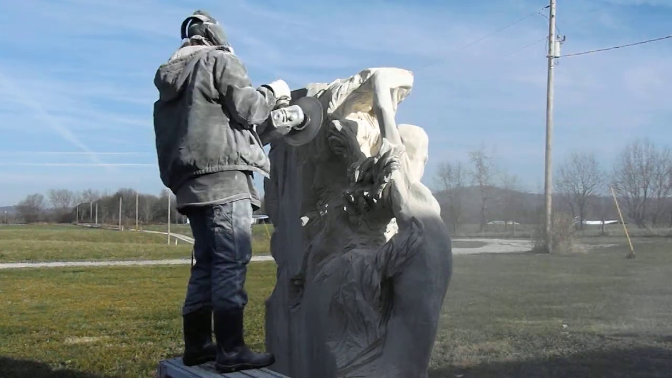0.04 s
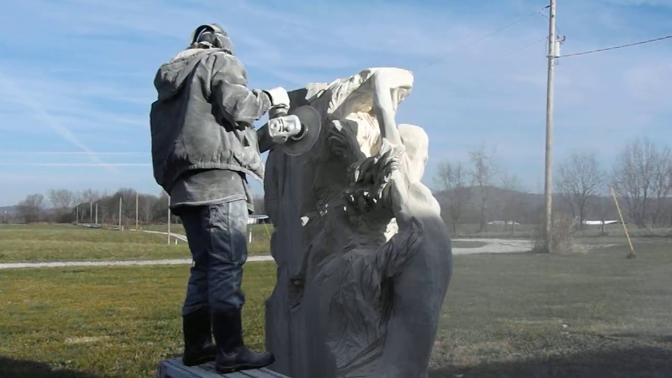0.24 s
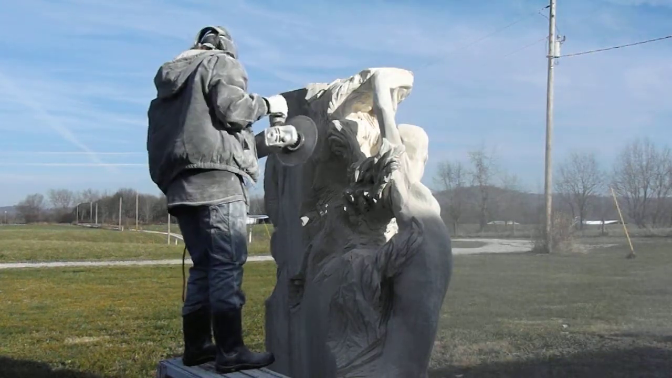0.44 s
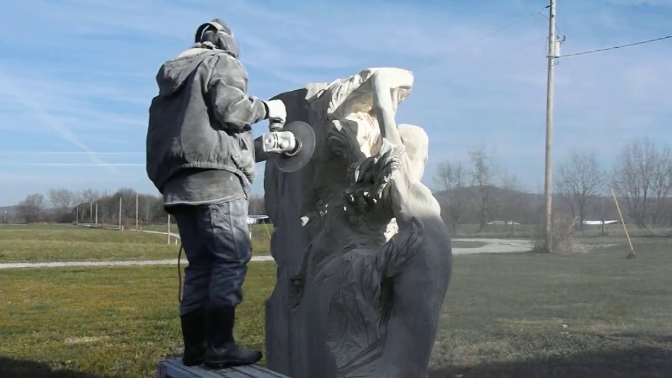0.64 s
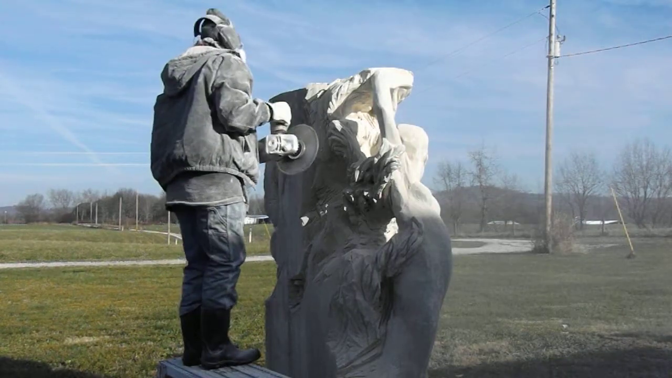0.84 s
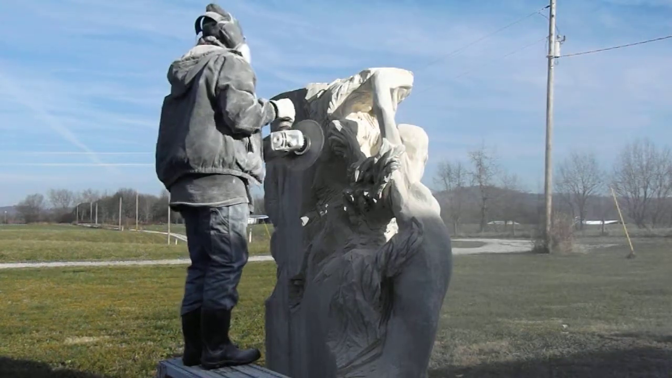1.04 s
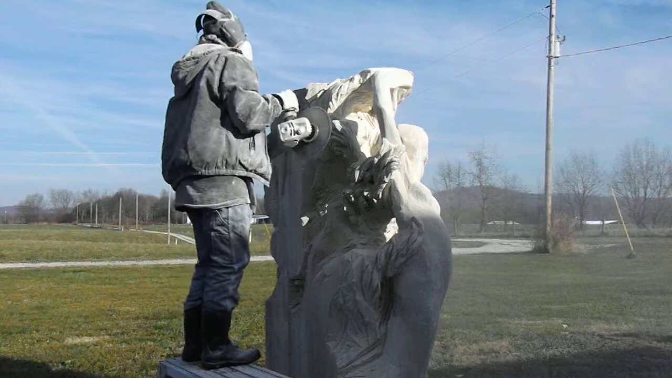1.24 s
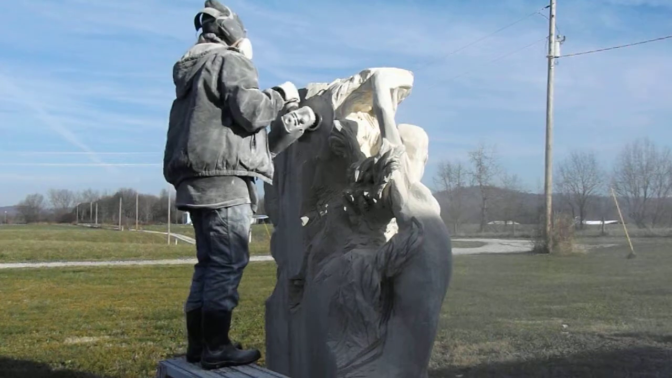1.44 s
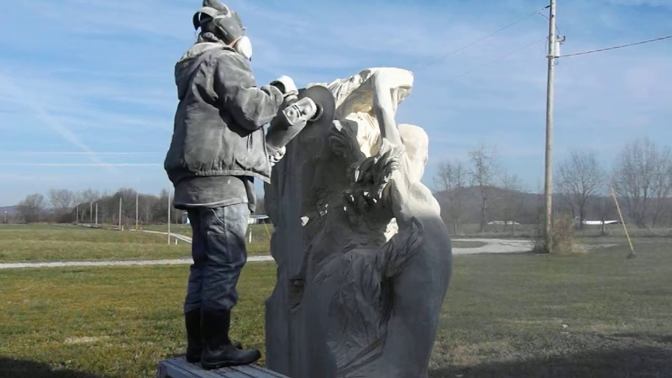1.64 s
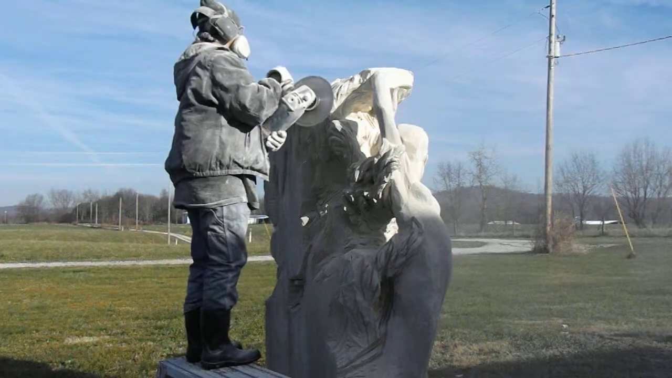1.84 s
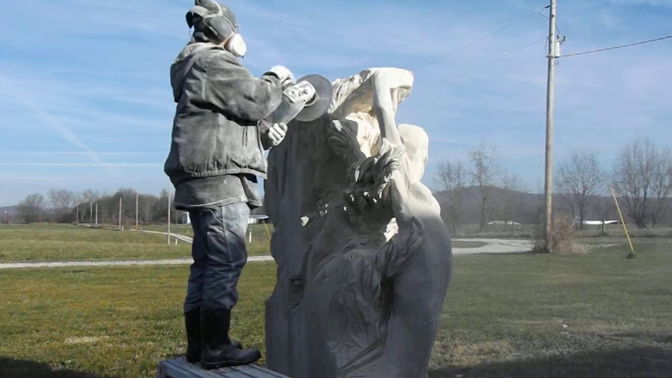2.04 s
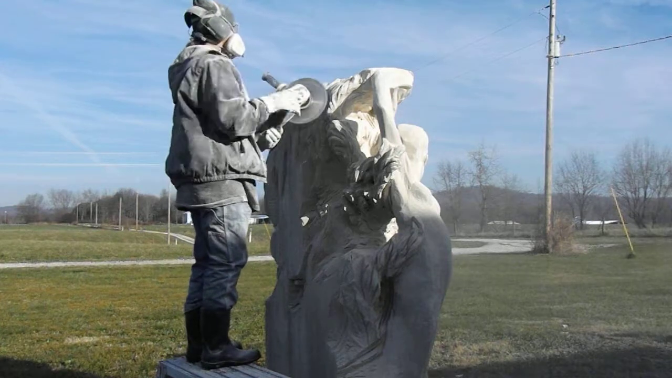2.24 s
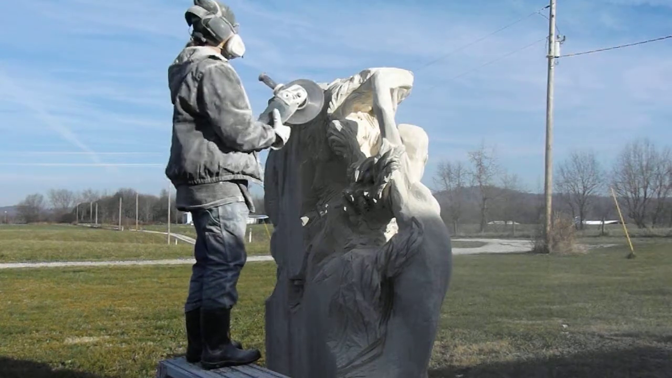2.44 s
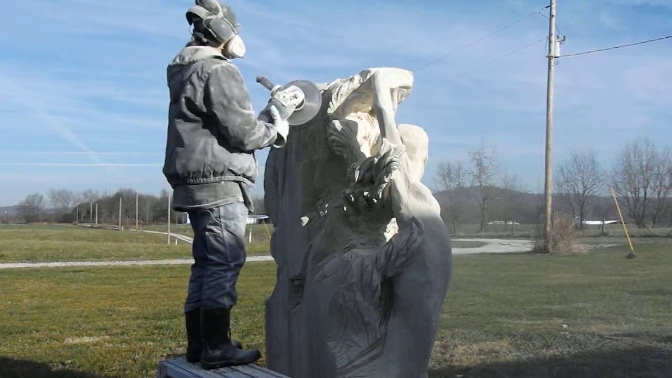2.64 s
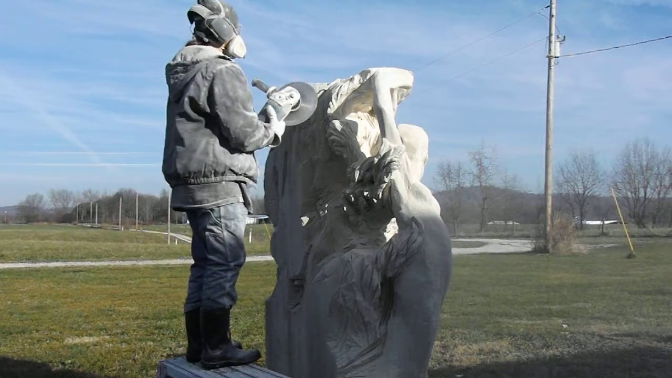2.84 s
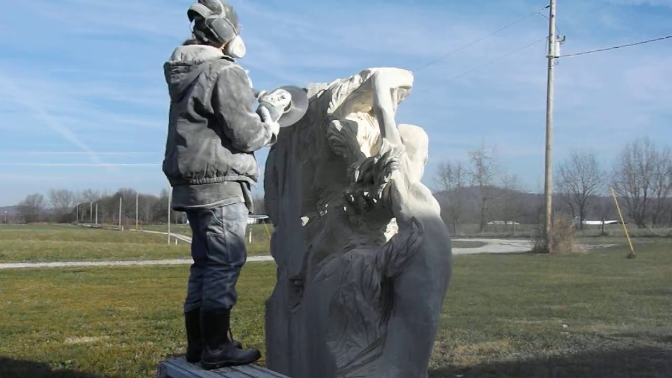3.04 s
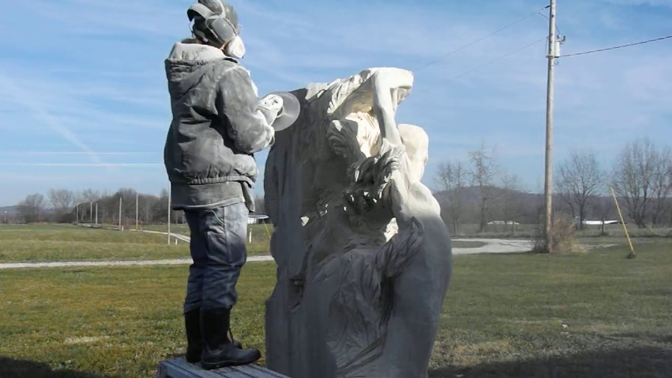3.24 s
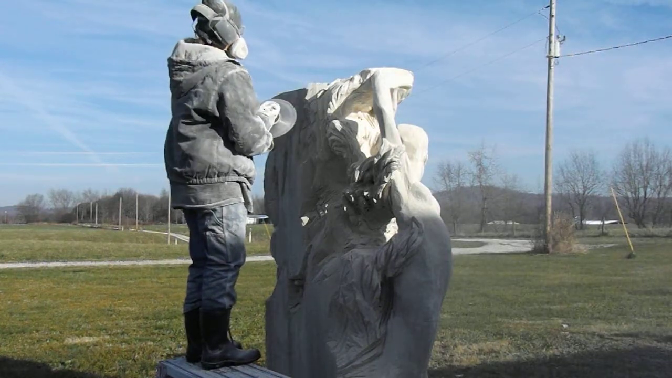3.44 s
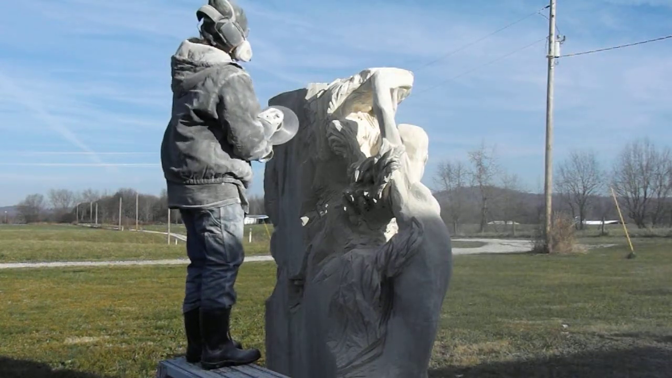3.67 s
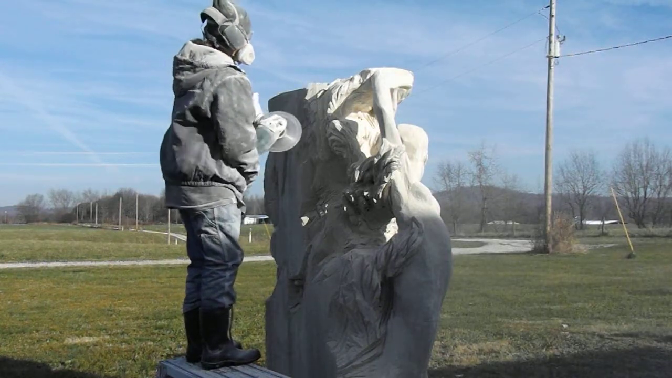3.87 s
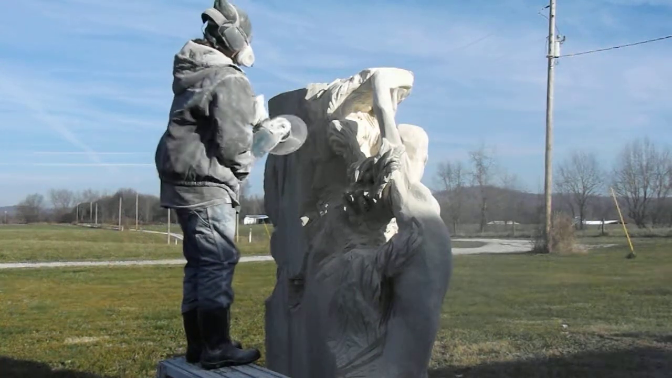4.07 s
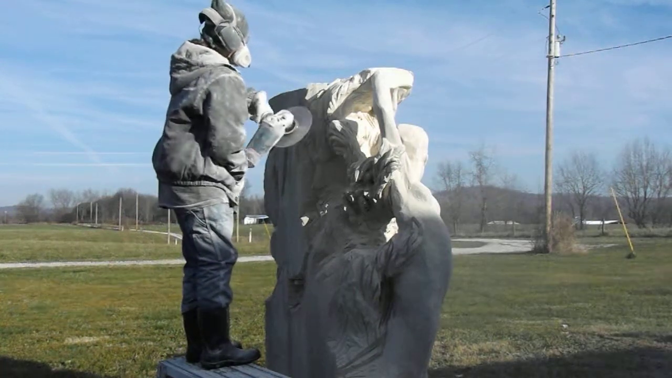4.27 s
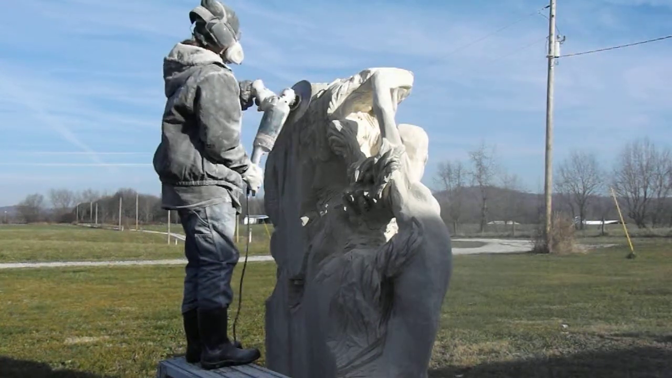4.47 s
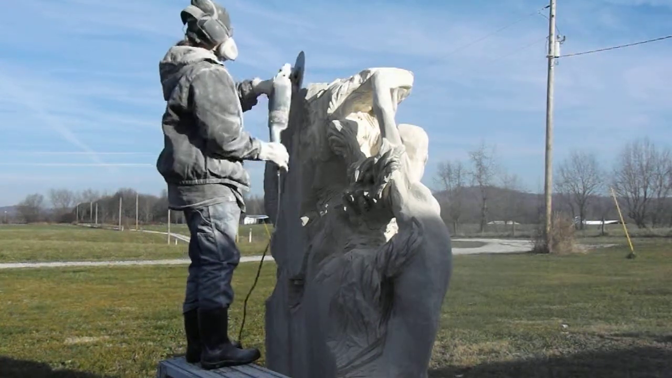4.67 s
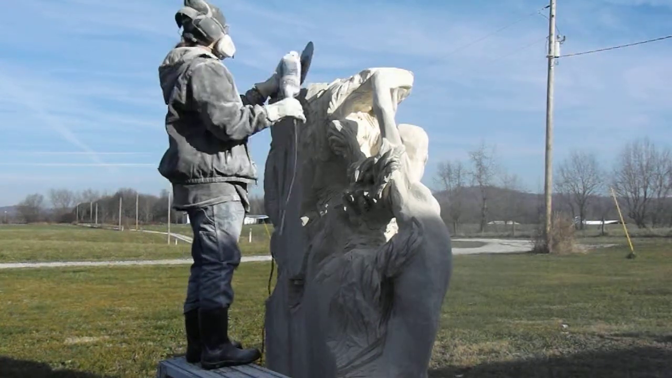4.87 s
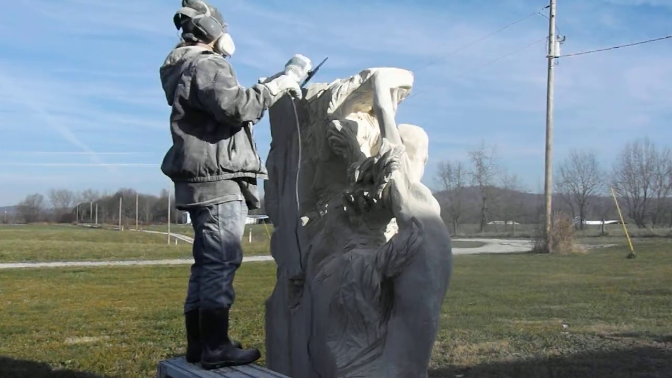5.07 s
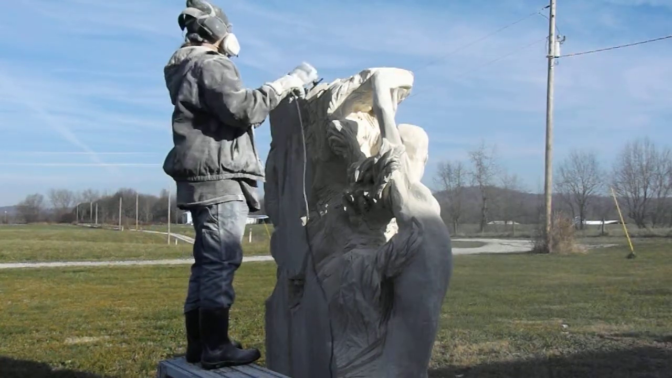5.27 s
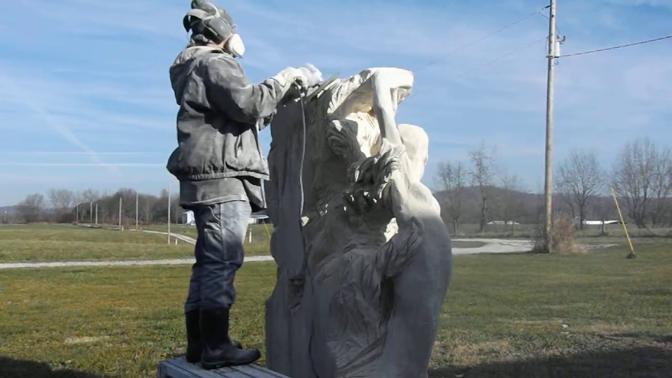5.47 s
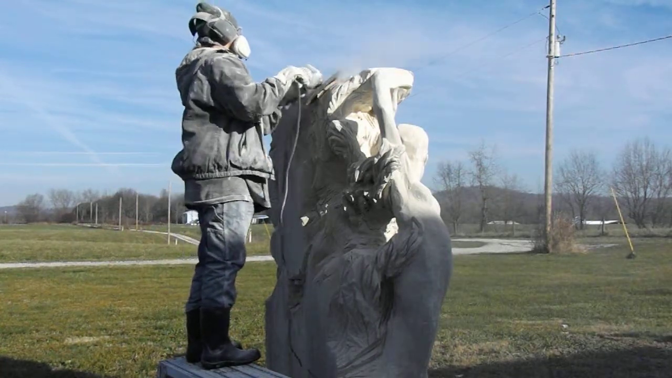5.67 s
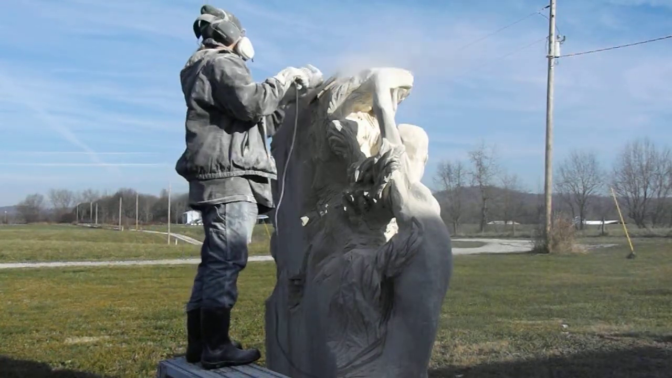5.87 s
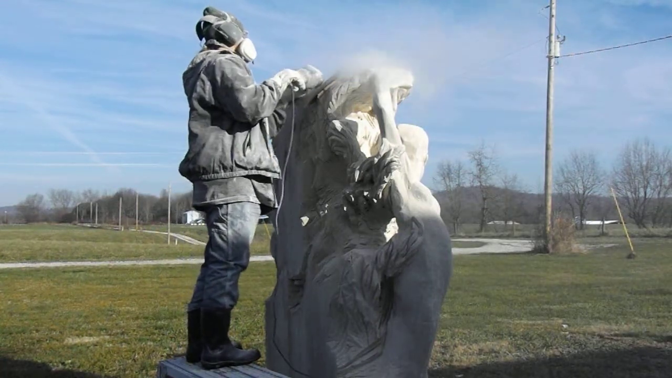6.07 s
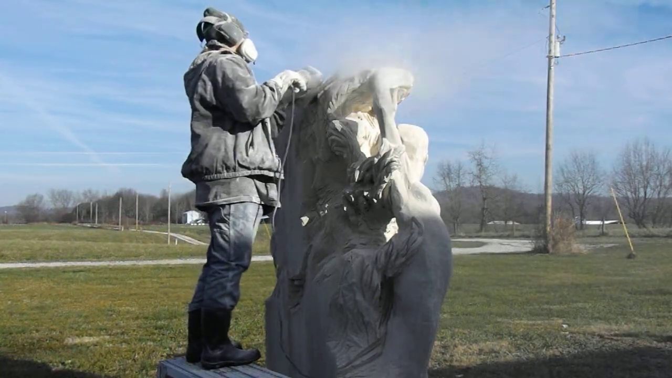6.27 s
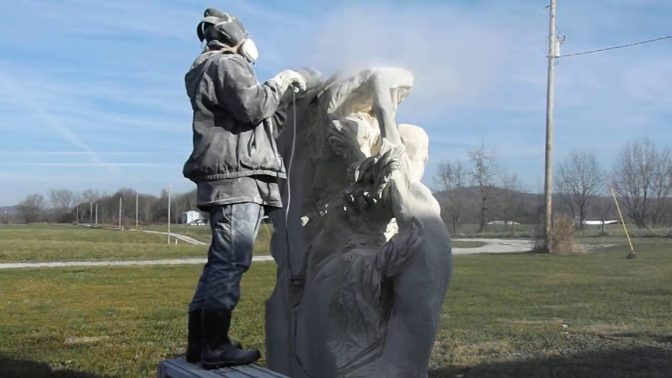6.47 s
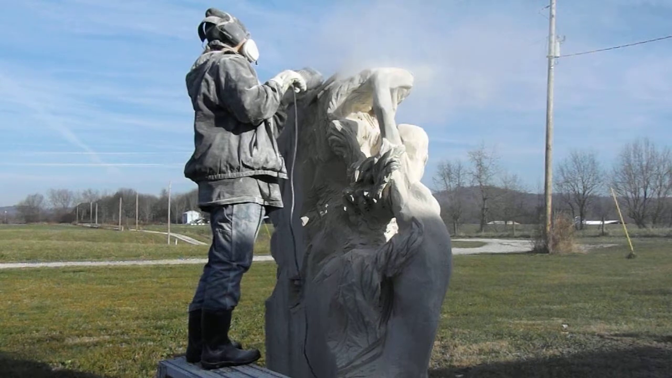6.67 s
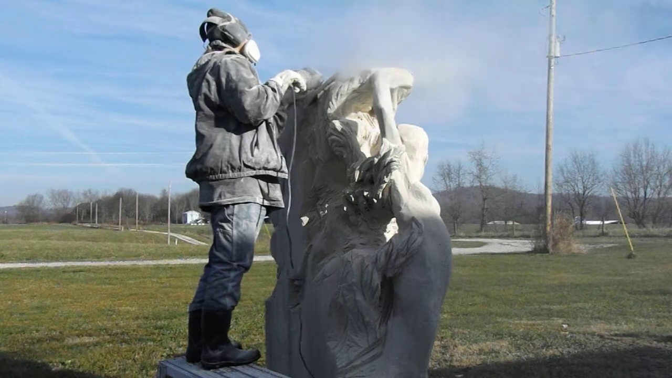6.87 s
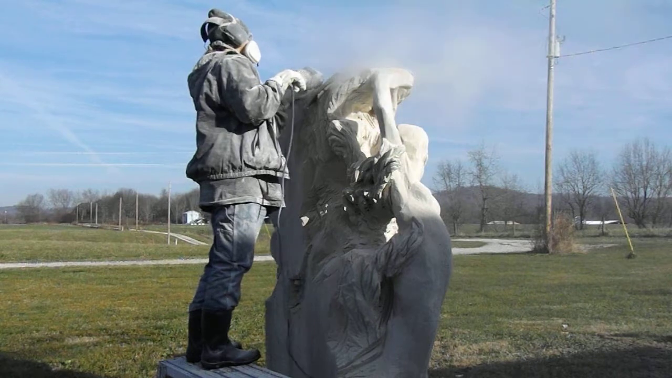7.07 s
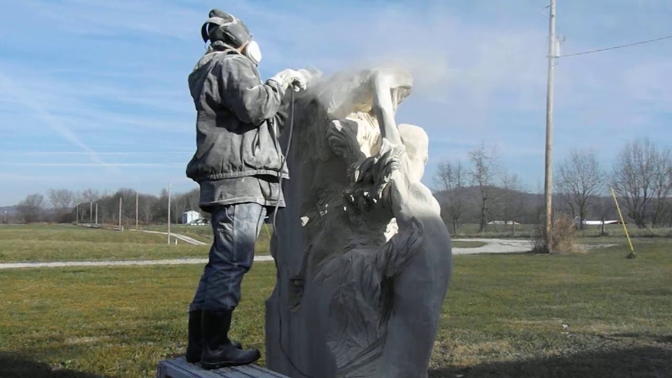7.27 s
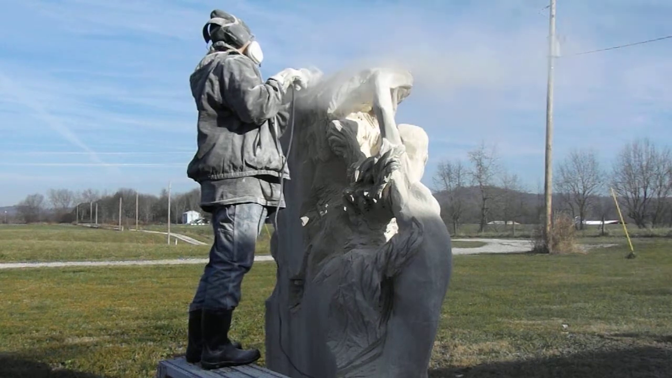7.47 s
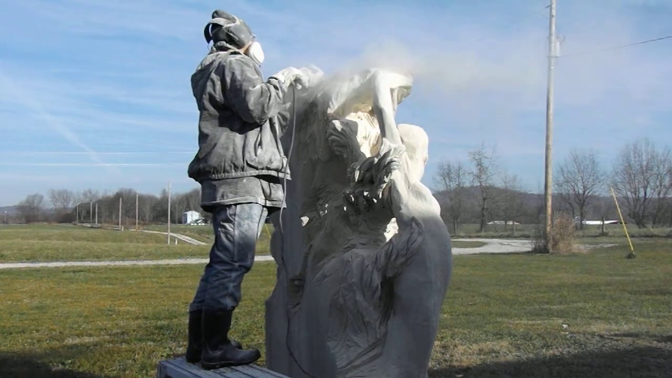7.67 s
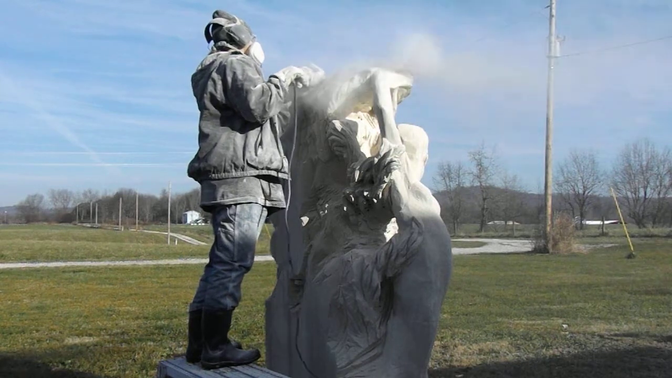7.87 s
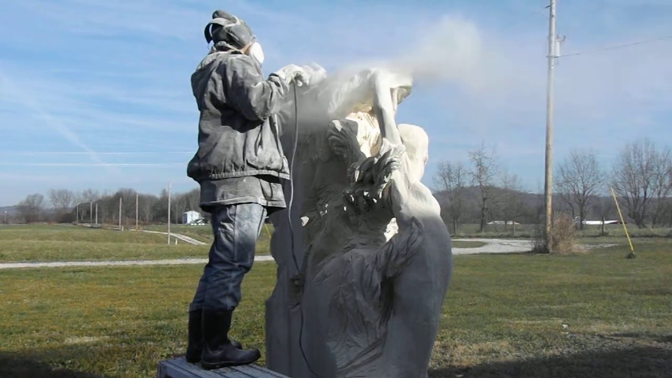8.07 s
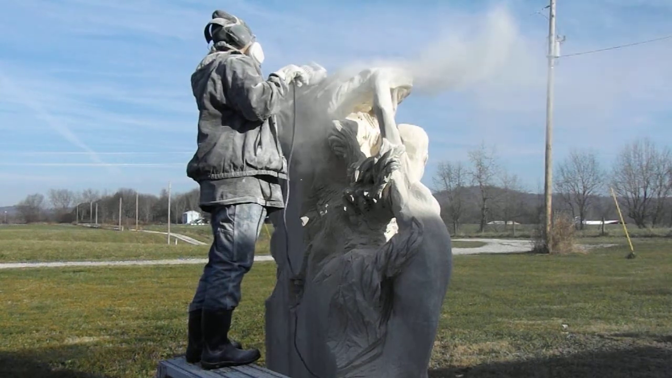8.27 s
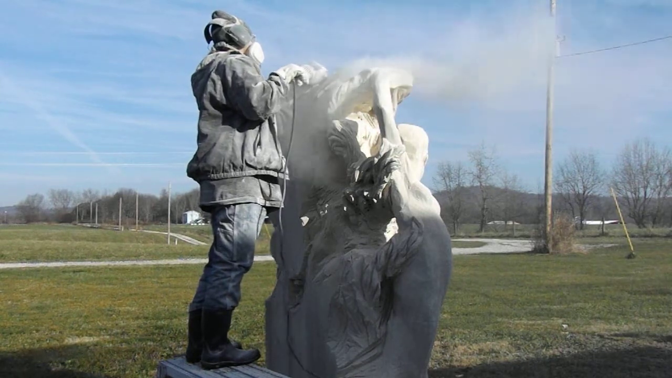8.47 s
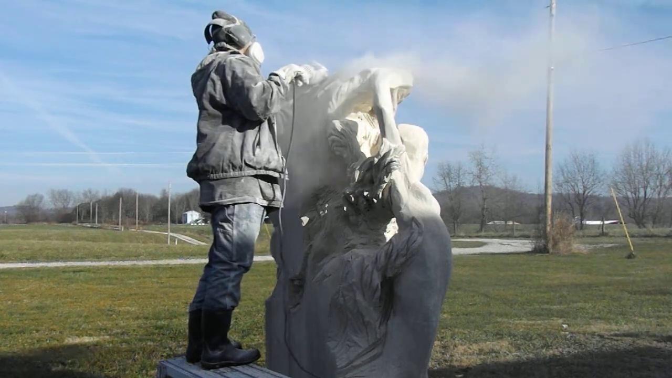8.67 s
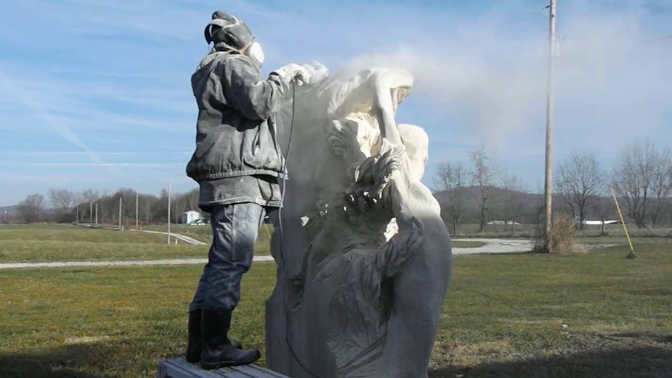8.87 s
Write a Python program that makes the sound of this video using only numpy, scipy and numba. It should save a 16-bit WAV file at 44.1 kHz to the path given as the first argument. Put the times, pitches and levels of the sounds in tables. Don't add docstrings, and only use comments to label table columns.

```python
import sys
import numpy as np
from scipy import signal
from scipy.fft import rfft, irfft
from scipy.io import wavfile
from scipy.ndimage import uniform_filter1d
from numba import njit

SR = 44100
rng = np.random.default_rng(int(sys.argv[2]) if len(sys.argv) > 2 else 0)


def pcm_store(signal):
    levels = np.round(np.clip(np.atleast_2d(signal), -1, 1) * 32767)
    wavfile.write(sys.argv[1], SR, levels.astype(np.int16).T)


def linear_from_db(decibels):
    return 10 ** (np.asarray(decibels, float) / 20)


N = 393372
t = np.arange(N) / SR
TOUCH_S = 5.453
DROWNED_S = TOUCH_S + 0.14


def curves(table):
    s, *columns = np.transpose(table)
    return [np.interp(t, s, c) for c in columns]


def unit(x):
    return x / np.sqrt(np.mean(x ** 2))


def walk(rate):
    k = int(SR / rate)
    steps = np.repeat(rng.standard_normal(N // k + 1), k)
    return 1.04 * uniform_filter1d(uniform_filter1d(steps, k), k)[:N]


def colour(x, table):
    hz, db = np.transpose(table)
    f = np.fft.rfftfreq(N, 1 / SR) + 1
    return irfft(rfft(x) * linear_from_db(np.interp(np.log(f), np.log(hz), db)), N)


BAND_EDGES_HZ = [1400, 4400, 7000]


def bands(x, main_db, low_db, body_db, top_db):
    f, spectrum = np.fft.rfftfreq(N, 1 / SR) + 1, rfft(x)
    below = [0 * f] + [1 / (1 + (f / edge) ** 8) for edge in BAND_EDGES_HZ] + [1 + 0 * f]
    parts = [unit(irfft(spectrum * (b - a), N)) for a, b in zip(below, below[1:])]
    return linear_from_db(main_db) * sum(linear_from_db(db) * p for db, p in zip([low_db, body_db, 0, top_db], parts))


@njit
def ring(x, hz, width):
    y, band, low = np.empty(len(x)), 0., 0.
    for i in range(len(x)):
        g, k = np.tan(np.pi * hz[i] / SR), width / hz[i]
        v = (band + g * (x[i] - low)) / (1 + g * (g + k))
        band, low, y[i] = 2 * v - band, low + 2 * g * v, k * v
    return y


def ring_twice(x, hz, width):
    return ring(ring(x, hz, width), hz, width)


@njit
def gain_control(x, top, attack, release):
    y, e = np.empty(len(x)), top
    for i in range(len(x)):
        y[i] = x[i] * top / e
        want = max(abs(x[i]), top)
        e += (want - e) * (attack if want > e else release)
    return y


# time in seconds, speed in turns a second.
DISC_SPEED = [
    (5.5, 96.4),
    (5.8, 90.4),
    (6.0, 86.0),
    (6.17, 80.2),
    (6.5, 75.2),
    (7.0, 69.9),
    (7.6, 65.3),
    (7.9, 62.5),
]


def disc_spin():
    return curves(DISC_SPEED)[0]


# time in seconds, hiss in dB as the fan faces us, whine in dB,
# vent resonance in Hz as it tilts, brush window open 0-1.
HOLD_PATH = [(0.0, -20, -38, 1110, .7), (0.25, -19.5, -35, 1070, .95), (1.05, -19, -34.5, 1060, .95),
             (1.3, -19, -36, 990, .75), (1.8, -20, -37.5, 970, .85), (2.2, -21.5, -45, 1020, .55),
             (2.5, -20.5, -42.5, 1030, .6), (3.0, -22, -39.5, 1060, .65), (3.5, -25.5, -39, 1040, .15),
             (4.1, -21.5, -35.5, 1070, .6), (4.5, -22.5, -41, 875, .85), (4.7, -23.5, -44, 825, .3),
             (5.15, -27, -43.5, 875, .1), (5.42, -26, -43.5, 1170, .1), (5.62, -32, -55.5, 1220, .1),
             (6.8, -24, -72.5, 1220, .1), (7.4, -23, -58, 1220, .1), (7.75, -28, -70, 1220, .1)]


def hold():
    hiss_db, whine_db, vent_hz, window = curves(HOLD_PATH)
    upright_hz, tilted_hz = 1000, 850
    tilt = np.clip((upright_hz - vent_hz) / (upright_hz - tilted_hz), 0, 1)
    return hiss_db, whine_db, vent_hz, window, tilt


def held_db(db, per_db_away, tilted_db):
    hiss_db, _, _, _, tilt = hold()
    facing_db = -19.5
    return db + per_db_away * (facing_db - hiss_db) + tilted_db * tilt


# multiple of motor speed, level in dB against the whine.
MOTOR_ORDERS = [(.5, -32), (4, -18)]


def motor(spin):
    gear, bars = 4.408, 30
    _, whine_db, _, window, _ = hold()
    drown_db = np.interp(t, [TOUCH_S, DROWNED_S], [0, -45])
    bars_db = -45.5 - 22 * (1 - window) + drown_db
    third_db = held_db(-30, 0.1, tilted_db=-4.5) + drown_db
    eighth_db = whine_db + 6 + held_db(0.3, 0.96, tilted_db=-3) + drown_db
    whine_db = whine_db + 3.0 * walk(8) * (t > DROWNED_S)
    turn = 2 * np.pi * np.cumsum(gear * spin * (1 + 0.0006 * walk(6))) / SR
    whine = np.sin(turn)
    for k, db in MOTOR_ORDERS:
        whine += linear_from_db(db + 11.0 * walk(4.7)) * np.sin(k * turn)
    out = linear_from_db(whine_db + 1.0 * walk(30)) * whine
    out += linear_from_db(bars_db) * np.sin(bars * turn)
    third_db = third_db - 6.5 + 2.0 * walk(5.42) + 1.8 * walk(40)
    out += linear_from_db(third_db) * np.sin(3 * turn + 1.37 * walk(50))
    eighth_db = eighth_db - 8 + 4.0 * walk(80)
    out += linear_from_db(eighth_db) * np.sin(8 * turn + 2.5 * walk(120))
    return np.sqrt(2) * out


# centre in Hz, width in Hz, gain.
CASE_MODES = [(2220, 87, 0.49), (3020, 59, 0.71), (3840, 290, 0.44), (4240, 130, 0.38), (4780, 63, 0.65),
              (5780, 870, 0.74), (9780, 550, 0.53)]
# frequency in Hz, density in dB per Hz.
HISS_COLOUR = [(18, -83), (30, -48), (164, -59), (208, -32.5), (379, -12.5), (421, -11.5), (480, -17),
               (592, -4), (789, -6), (1230, -2), (1400, -7), (5760, -9), (7100, -16.5), (12300, -30.5),
               (15600, -39)]


def air():
    hiss_db, _, vent_hz, _, tilt = hold()
    noise = rng.standard_normal(N)
    backlash = np.sin(2 * np.pi * np.cumsum(41 * (1 + 0.42 * walk(3.8))) / SR)
    shake = linear_from_db(backlash + 1.14 * walk(90)) - 1
    case = ring(noise * shake, 4300 + 0 * t, 5800.0)
    for hz, width, gain in CASE_MODES:
        case += gain * ring(noise, hz + 0 * t, 1. * width)
    inlet = ring(noise, 1237 + 0 * t, 46.0)
    case += 1.17 * (1 - tilt) * linear_from_db(3.2 * walk(25.07)) * inlet
    vent = (0.7 + 2.0 * tilt) * ring(noise, vent_hz, 104.0)
    hiss = colour(noise + case + vent, HISS_COLOUR)
    edge = signal.sosfiltfilt(signal.butter(2, 10500, "high", fs=SR, output="sos"), hiss)
    hiss = hiss + (linear_from_db(held_db(1, -0.051, tilted_db=-.3)) - 1) * edge
    hiss = bands(hiss * linear_from_db(0.28 * walk(24.76)), hiss_db,
                 low_db=held_db(-10.5, 0.35, tilted_db=-2),
                 body_db=held_db(-4, 0.075, tilted_db=1.3),
                 top_db=held_db(-9.5, 0.28, tilted_db=-2))
    return hiss * linear_from_db(np.interp(t, [TOUCH_S + 0.077, TOUCH_S + 0.1], [0, -22]))


# start in seconds, length in seconds,
# knocks a second, peak in dB, deeper resonance in dB.
RATTLE_RUNS = [(0.027, 1.2, 43, -11.5, -6.5), (1.229, 0.95, 42, -10, -9), (2.265, 0.12, 42, -9.5, -10),
               (2.403, 0.6, 35, -11.5, -12), (2.997, 0.8, 39, -15, -8), (3.815, 0.17, 35, -10.5, -10),
               (4, 0.19, 37, -9, -6), (4.213, 0.17, 33, -9, -5), (4.396, 0.2, 43, -12, -5),
               (4.599, 0.14, 35, -6, -7), (4.742, 0.16, 40, -9.5, -4), (4.901, 0.33, 43, -13, -8.5)]


def knocks():
    jitter_s, scatter_db = 0.0012, 1.5
    out, tail = np.zeros(N + 600), np.arange(600) / SR
    high_hz, deep_hz = 4900 + 0 * tail, 3370 + 0 * tail
    for start, length, rate, db, deep_db in RATTLE_RUNS:
        chance = rng.standard_normal((64, 603))
        for s, (late, hard, dull, *noise) in zip(np.arange(start, start + length, 1 / rate), chance):
            blow = noise * tail ** 2 * np.exp(-tail / 0.0012)
            burst = ring_twice(blow, high_hz, 780.0)
            burst += linear_from_db(deep_db + 5.5 + 1.9 * dull) * ring_twice(blow, deep_hz, 700.0)
            at = int((s + jitter_s * late) * SR)
            out[at:][:600] += linear_from_db(db + scatter_db * hard) * burst / np.abs(burst).max()
    return out[:N]


# centre in seconds, peak in dB, length in seconds.
WIND_PUFFS = [
    (0.15, -71, .2),
    (0.75, -67, .05),
    (1.05, -72, .15),
    (1.51, -74, .07),
    (1.86, -79, .06),
    (2.35, -87, .1),
    (4.65, -74, .06),
    (4.92, -77, .08),
    (6.83, -78, .04),
]


def breeze():
    calm_db = -88
    puffs = sum(linear_from_db(db) * np.exp(-((t - s) / length) ** 2) for s, db, length in WIND_PUFFS)
    noise = colour(rng.standard_normal(N), [(40, -4), (100, 1), (200, -9), (400, -40)])
    return unit(noise) * (linear_from_db(calm_db) + puffs) * linear_from_db(2.5 * walk(12))


def ping():
    since = np.maximum(t - TOUCH_S, 0)
    return linear_from_db(-10.0) * np.sin(2 * np.pi * 7650 * since) * np.exp(-since / 0.0068)


# centre in seconds, depth in dB, length in ms.
DISC_SKIPS = [(5.472, 8, 9.4), (5.501, 6, 8.9), (5.904, 4, 13), (6.173, 7.5, 12), (6.651, 6, 18),
              (6.847, 8, 12), (7.069, 2.5, 13), (7.212, 3, 16), (7.58, 4, 11), (7.825, 9, 5.5),
              (7.925, 4, 25), (8.12, 2, 12), (8.214, 2, 33), (8.414, 1, 9), (8.521, 7, 8)]


def chips():
    ticks = (rng.random(N) < 45 / SR) * linear_from_db(-3.0 * rng.exponential(size=N)) * (t > TOUCH_S)
    for s, _, ms in DISC_SKIPS:
        ticks[int((s - ms / 2000) * SR)] = 0.89
    return linear_from_db(9) * ring_twice(ticks * np.sign(rng.standard_normal(N)), 4600 + 0 * t, 4600.0)


def scrape(turns):
    rim = rng.standard_normal(512)
    repeat = np.interp(turns % 1 * 512, np.arange(512), rim, period=512)
    every_other = np.sin(2 * np.pi * turns / 2 + walk(6.2))
    chatter = linear_from_db(1.27 * walk(70) + .5 * walk(25) + 1.56 * every_other)
    return (rng.standard_normal(N) + 0.47 * repeat) * linear_from_db(1.2 * rng.exponential(size=N)) * chatter


# pitch in Hz at rest, waves round the rim (minus: against the spin).
DISC_WAVES = [(755, 3), (1240, 0), (1445, 1), (1880, 0), (2160, 4), (3920, -11), (2725, 5), (3240, 8),
              (3920, 11), (4685, 12), (5270, 13), (8590, -17), (6840, 15), (4290, 0), (7690, 16),
              (10505, -19), (11520, -20), (8590, 17), (9040, 12), (12575, -21), (9520, 18), (10110, 14),
              (13670, -22), (10505, 19), (14790, -23), (11520, 20), (12655, 15), (15960, -24), (12575, 21),
              (13670, 22)]
# shallow cut in dB, deep cut in dB.
DISC_WAVE_LEVELS = [(-33.5, -36.5), (-25.5, -32.5), (-27.5, -37.5), (-39, -40), (-54, -36.5), (-55, -37.5),
                    (-47, -42.5), (-32.5, -40), (-37, -32), (-26, -28.5), (-32, -54), (-45, -39),
                    (-46, -45), (-34, -59), (-41.5, -39), (-57, -46), (-50, -44), (-43, -43), (-40, -46),
                    (-51, -45), (-45, -48), (-50, -51), (-58, -51), (-39, -62), (-48, -56), (-52, -48),
                    (-48, -56), (-56, -56), (-52, -51), (-57, -53)]
FRESH_RIM_DB = [3.1, -3.2, -5, -1, 21, -5, 11, 2.5, 12, -1.5, 0, -2, 2, 3, 2, -4, -7, -12, -7, .3, -7, -12,
                .3, -6, .3, -4, .3, .3, .3, .3]


def disc_waves(grit, spin, turns, depth, start):
    out = np.zeros(N - start)
    fresh = np.exp(-(np.maximum(t - TOUCH_S, 0) / 0.45) ** 2)
    judder = spin * (1 + 0.023 * walk(40))
    for (rest_hz, count), (shallow_db, deep_db), fresh_db in zip(DISC_WAVES, DISC_WAVE_LEVELS, FRESH_RIM_DB):
        hz = (rest_hz + count * judder)[start:]
        width = 85 + 70000 / rest_hz
        wave = unit(ring(ring(grit[start:], hz, width), hz, 3 * width))
        wave *= 1 + 0.28 * np.sin(2 * np.pi * (turns[start:] + rng.random()))
        level_db = shallow_db + fresh * fresh_db + depth * (deep_db - shallow_db)
        level_db = level_db + 1.5 * walk(4.5) + 0.67 * walk(30)
        out += wave * linear_from_db(level_db)[start:]
    return out


# multiple of disc speed, shallow cut in dB, deep cut in dB.
DISC_WOBBLE = [(2, -95, -66), (3, -90, -68), (5, -80, -64), (6, -80, -65), (8, -47.5, -61), (11, -66, -53),
               (12, -66, -53), (14, -62, -51)]


def wobble(turns):
    settle = np.interp(t, [6.0, 6.3, 7.6, 7.9], [0, .5, .5, 1])
    out = np.zeros(N)
    for k, shallow_db, deep_db in DISC_WOBBLE:
        level_db = shallow_db + settle * (deep_db - shallow_db) - 22 * settle * (1 - settle)
        out += linear_from_db(level_db + 3.3 * walk(6)) * np.sin(2 * np.pi * k * turns)
    return out


# time in seconds, screech in dB, depth of the cut 0-1.
CUT_PATH = [
    (5.46, -14, 0.05),
    (5.56, -15, 0),
    (5.7, -19, 0),
    (6.04, -16.5, 0.3),
    (6.25, -17.5, 0.15),
    (6.9, -17.5, 0.33),
    (7.67, -19, 0.64),
    (8.1, -16.5, 1),
    (8.92, -17.5, 1.0),
]
# frequency in Hz, density in dB per Hz.
SCRAPE_COLOUR = [(18, -92), (30, -62), (66, -53), (480, -24), (675, -10.5), (948, -22.5), (1080, -12),
                 (1230, -8), (1400, -7.5), (1870, -3.5), (2310, -9), (5060, -3), (5610, 1.5), (7100, -10.5),
                 (15600, -30.5)]


def cut(spin):
    turns = np.cumsum(spin) / SR
    grit = scrape(turns)
    screech_db, depth = curves(CUT_PATH)
    depth = np.clip(depth, 0, 1)
    start = int(5 * SR)
    out = linear_from_db(-18.0) * unit(colour(grit, SCRAPE_COLOUR))
    out[start:] += disc_waves(grit, spin, turns, depth, start)

    bite = np.exp(-(np.maximum(t - TOUCH_S, 0) / 0.09) ** 4)
    eased_db = -17 - screech_db
    low_db = -11 + 3 * bite + 2 * eased_db
    body_db = -3 + 0.6 * depth - 4 * bite + 1.3 * eased_db
    sheen_db = -16 + 4 * depth + 5.5 * bite + 1.1 * eased_db
    sheen_db += 7 * np.exp(-((t - 5.508) / 0.028 * 2 - 1) ** 4)
    share = np.sqrt(1 - start / N)
    out = share * bands(out * (t > 5), screech_db, low_db, body_db, sheen_db)
    out = signal.sosfilt(signal.butter(2, 420, "high", fs=SR, output="sos"), out)
    out += wobble(turns)
    skip_db = sum(db * np.exp(-.5 * ((t - s) / (ms / 2200)) ** 2) for s, db, ms in DISC_SKIPS)
    touch = np.clip((t - TOUCH_S) / .003 + .3, 0, 1)
    return out * touch * linear_from_db(-skip_db)


def scene():
    spin = disc_spin()
    grinder = motor(spin) + air() + knocks()
    stone = ping() + chips() + cut(spin)
    return np.tile(grinder + stone, (2, 1))


def band_limit(x):
    return signal.sosfilt(signal.butter(12, 15720, fs=SR, output="sos"), x)


def record(dry):
    x = gain_control(dry[0], 0.69, 0.029, 0.00044)
    x = 1.363 * np.tanh(x / 1.321)
    x = signal.lfilter(*signal.iirnotch(7000, 60, SR), x)
    x = signal.sosfilt(signal.butter(5, 180, "high", fs=SR, output="sos"), x)
    x = x * np.clip((t[-1] - t) / .002, 0, 1)
    return band_limit(np.tile(x + breeze(), (2, 1)))


dry = scene()
out = record(dry)
pcm_store(out)
```